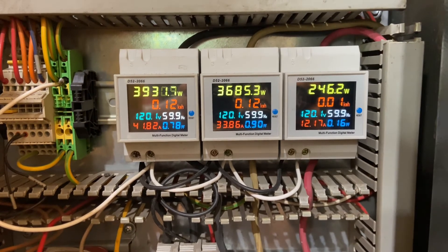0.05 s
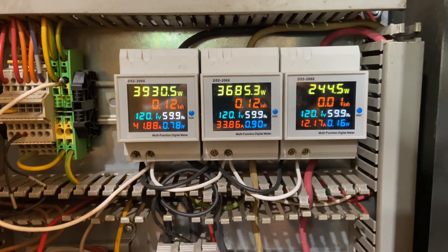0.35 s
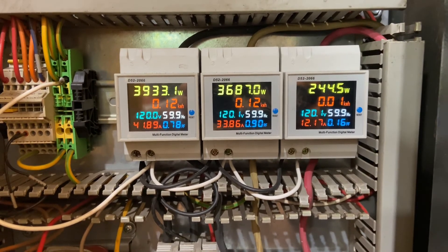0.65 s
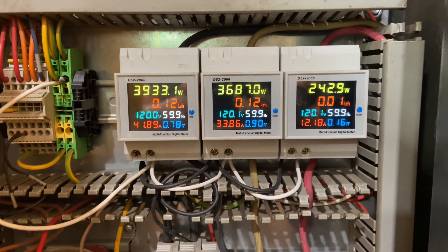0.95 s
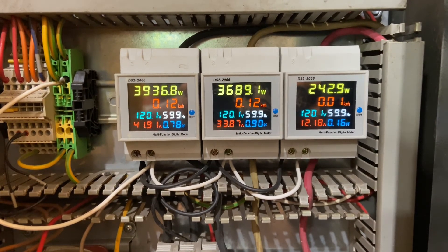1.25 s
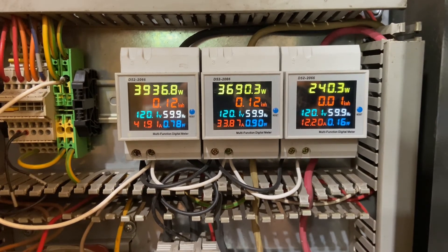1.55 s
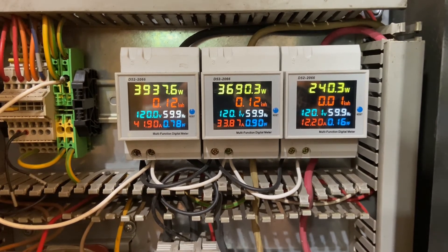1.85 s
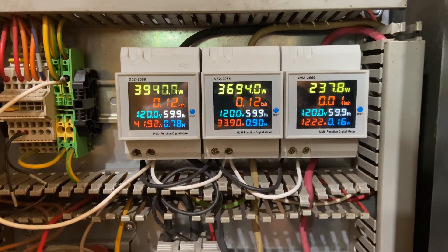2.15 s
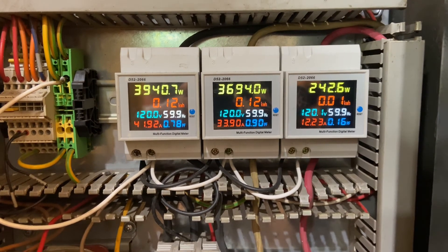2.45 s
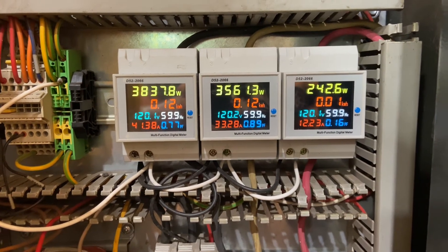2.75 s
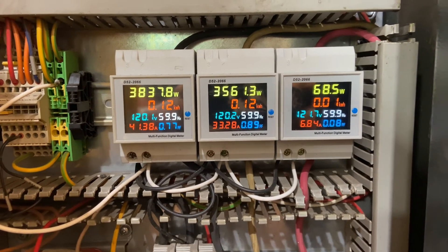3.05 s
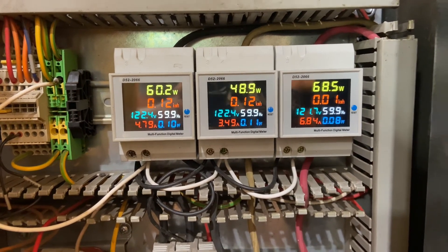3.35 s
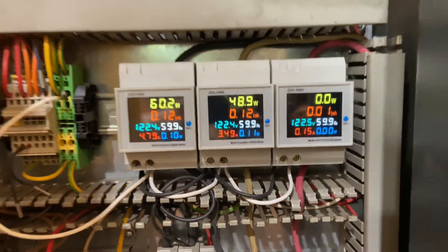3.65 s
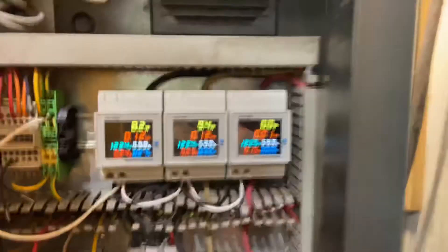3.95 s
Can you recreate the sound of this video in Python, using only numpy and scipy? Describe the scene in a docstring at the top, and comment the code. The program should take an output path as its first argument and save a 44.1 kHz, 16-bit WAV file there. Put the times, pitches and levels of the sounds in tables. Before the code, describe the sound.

An electric compressor runs with a loud steady hum, whine and rushing air. At about 2.3 seconds its power switch drops out with a sharp clunk, slightly left, and the hum stops. The whine falls and fades by about 3 seconds as the casing briefly shudders and rumbles. Ventilation and other machines' low hum carry on until 4 seconds, with a faint high whistle coming and going from 2.5 seconds.

```python
"""A compressor switches off

An electric compressor in a plant room, heard from its open switch cabinet, hums, whines and rushes
with air. Its contactor (the big power switch) drops out with a clunk and the hum stops. The shaft
runs down, and its falling overtones make the casing ring. Other machines' low hum and the
ventilation remain, with a faint whistle."""
import sys
import numpy as np
from scipy import signal
from scipy.fft import rfft, irfft
from scipy.io import wavfile

SR = 44100
rng = np.random.default_rng(int(sys.argv[2]) if len(sys.argv) > 2 else 0)


def inscribe(sig):
    """Save sig as 16-bit PCM at rate SR to the path in sys.argv[1].

    A 1-D sig is mono; a 2-D sig holds one channel per row.
    Samples are clipped to [-1, 1] before scaling.
    """
    pcm = np.round(np.clip(np.atleast_2d(sig).T, -1, 1) * 32767)
    wavfile.write(sys.argv[1], SR, pcm.astype(np.int16))


N = 176400
T = np.arange(N) / SR

OFF_S = 2.275  # the power is cut
COAST_S = 0.43  # run-down time: in each such span the shaft falls to 37% of its speed
SHAFT_HZ, MAINS_HZ = 59.078, 60.0
CLUNK_PAN_DB = 4  # the clunk and the casing are this much louder on the left

# How wide the compressor's noise sounds. Each row: pitch in Hz, stereo side minus middle in dB.
COMPRESSOR_WIDTH = [(60, -21), (83, -30), (110, -20), (160, -24), (220, -33), (300, -2), (420, -15.5),
                    (580, 1.5), (810, -3.5), (1120, -4.5), (1540, 10.5), (2140, -2.5), (2960, -3),
                    (4090, -2), (5660, -5), (7830, 1.5), (10800, -3.5), (15000, 3)]


def from_db(db):
    """Turn decibels into a gain."""
    return 10 ** (np.asarray(db) / 20)


def rms_one(x):
    """Scale a signal to an average power of 1."""
    return x / np.sqrt(np.mean(x ** 2) + 1e-20)


def in_time(rows):
    """Join (seconds, value) rows by straight lines."""
    return np.interp(T, *np.transpose(rows))


def at_hz(points, hz):
    """Read between (Hz, value) rows, with octaves evenly spaced."""
    freqs, values = np.transpose(points)
    return np.interp(np.log(np.maximum(hz, 1)), np.log(freqs), values)


def pan(db):
    """Left and right gains that put the left db above the right at the same total power."""
    return rms_one(from_db([[db / 2], [-db / 2]]))


def drift(rate):
    """A smooth random wander of typical size 1; a higher rate in Hz makes it quicker."""
    pole = np.exp(-200 * np.pi * rate / SR)
    steps = rng.standard_normal(N // 100 + 1002)  # one per 100 samples, plus a run-in
    slow = signal.lfilter([1], [1, -2 * pole, pole * pole], steps)[1000:]
    return np.interp(np.arange(N) / 100, np.arange(len(slow)), rms_one(slow))


def noise_bands(spectrum, width):
    """Stereo noise of a given spectrum and width, as half-octave bands: (centre in Hz, sound)."""
    f = np.arange(N // 2 + 1) * SR / N
    mid, side = rfft(rng.standard_normal((2, N)))
    side_gain = from_db(at_hz(width, f))
    stereo = mid + side_gain * side * [[1], [-1]]
    shaped = stereo * from_db(at_hz(spectrum, f)) * np.sqrt(SR / 2 / (1 + side_gain ** 2))
    place = np.clip(2 * np.log2(np.maximum(f, 1) / 62.5), 0, 16)  # half octaves above 62.5 Hz
    return [(62.5 * 2 ** (k / 2), irfft(shaped * np.maximum(0, 1 - abs(place - k)), N))
            for k in range(17)]


def noise(spectrum):
    """Steady stereo noise of a given spectrum, as wide as the compressor."""
    return sum(band for _, band in noise_bands(spectrum, COMPRESSOR_WIDTH))


def tone(hz, db, waver_db):
    """A pure tone whose level wavers around db."""
    turns = np.cumsum(hz * np.ones(N)) / SR + rng.random()
    return np.sqrt(2) * from_db(db + waver_db * drift(5.4)) * np.sin(2 * np.pi * turns)


def coloured(x, bumps):
    """Boost or cut a sound around each (Hz, width in Hz, dB) row."""
    f = np.arange(N + 1) * SR / (2 * N)
    gain = from_db(sum(db / (1 + (2 * (f - hz) / width) ** 4) for hz, width, db in bumps))
    return irfft(rfft(x, 2 * N) * gain)[:, :N]


def room_echo(x, fade_s=0.91):
    """Reflections blur into a tail, different on each side, that falls 60 dB in fade_s."""
    tail = rng.standard_normal((2, SR)) * from_db(-60 * T[:SR] / fade_s)
    return signal.fftconvolve(x, rms_one(tail) / np.sqrt(SR), axes=1)[:, :N]


def powered(release_s=0.011):
    """1 while current flows, then a quick fall to 0."""
    return np.exp(-np.maximum(T - OFF_S, 0) / release_s)


def mains_hum():
    """While powered, the motor's coils hum at twice the mains frequency, with weaker tones beside it."""
    # The main hum's loudness. Each row: time in seconds, level in dB.
    hum_levels = [(0, -16), (.9, -16), (1.3, -19), (1.55, -17), (2.25, -18)]
    # The weaker tones. Each row: pitch in Hz, level in dB, waver in dB.
    side_tones = [(60, -40, 1), (96, -40, 1), (168, -42, 2), (240, -38, 2), (300, -44, 1), (568, -49, 1),
                  (902, -45, 2), (1351, -50, 2), (1375, -46, 1), (1804, -47, 1)]
    hum = tone(2 * MAINS_HZ, in_time(hum_levels), waver_db=1)
    hum += sum(tone(*row) for row in side_tones)
    return hum * powered() * pan(1.5)


def shaft_whine(slowing, fade_db=26):
    """Overtones follow the shaft: nearly steady under power, then juddering, falling and fading."""
    # Strong overtones. Each row: multiple of the shaft's speed, level in dB, left minus right in dB,
    # how far the left wave leads in radians.
    overtones = [(8, -35, -1, 1.1), (11, -45, 1, .3), (13, -50, 1, -2.6), (15, -33, 4, -.8),
                 (16, -39, 0, -1.2), (17, -46, -1, .3), (19, -49, 8, .8), (24, -41, 0, -2.2),
                 (28, -40, -7, -2.3), (30, -48, -3, 0), (32, -45, 0, .4), (34, -49, 6, 2.6),
                 (39, -48, -1, 0), (40, -49.5, 2, .2), (41, -53, -8, 2.1), (45, -44, 1, -1),
                 (49, -52, 12, .7), (51, -53, 0, 0), (52, -45, 0, 2.2), (53, -45.5, 4, .3),
                 (54, -51, 12, 1), (55, -54, 0, 0), (58, -51, 12, -1.1), (62, -53, 3, 1), (63, -53, 6, 0),
                 (73, -56, 6, 0), (85, -57, -1, .5), (89, -58, 0, -.6), (93, -56, 2, 2.9),
                 (104, -52.5, 4, .3), (107, -59, 1, .8), (108, -60, 1, .2), (113, -55.5, 3, 0),
                 (126, -59, 1, 0)]
    # The weak overtones between them. Each row: pitch in Hz, level of an overtone there in dB.
    weak_levels = [(300, -50), (380, -60), (1000, -66), (2000, -55), (3100, -55.5), (4300, -61.5),
                   (5400, -72), (5900, -76), (6500, -78), (7400, -64), (8000, -67)]
    wobble = 0.00024 * drift(7.9)
    judder = 0.06 * (1 - powered()) * drift(70)
    speed_hz = SHAFT_HZ * np.exp(-slowing) * (1 + wobble + judder)
    angle = 2 * np.pi * np.cumsum(speed_hz) / SR
    strong = {round(row[0]): row[1:] for row in overtones}
    wavers = [from_db(1.3 * drift(4)) for _ in range(11)]
    whine = np.zeros((2, N))
    for k in range(5, 134):
        size, side, lead, start = rng.standard_normal(4)
        weak_db = at_hz(weak_levels, k * SHAFT_HZ) + 1.5 * np.tanh(size)
        db, pan_db, lead = strong.get(k, (weak_db, 4 * side, lead))
        phase = (k * angle + 2 * np.pi * start + np.array([[lead], [0]])).astype(np.float32)
        whine += np.sqrt(2) * from_db(db) * pan(pan_db) * wavers[k % len(wavers)] * np.sin(phase)
    whine *= from_db(-fade_db * slowing)
    return whine + from_db(-7.5) * room_echo(whine * (1 - powered()))


def rushing_air(slowing, flicker_db=1.74, power_off_db=-1.5):
    """Air and bearing noise dies away as the shaft slows, fastest around 4000 Hz."""
    # The noise at full speed. Each row: pitch in Hz, level in dB per Hz.
    spectrum = [(30, -76), (70, -54), (110, -49), (170, -51.5), (260, -60), (330, -60), (500, -63.5),
                (700, -59), (860, -62), (1200, -62), (1500, -58.5), (1850, -62.5), (2450, -68.5),
                (3100, -65), (4200, -72), (5200, -74.5), (5800, -80.5), (6500, -73), (7600, -78.5),
                (10500, -85), (16000, -88)]
    # How fast it fades. Each row: pitch in Hz, dB lost per run-down time.
    fades = [(150, 3.4), (700, 10.4), (2000, 12.7), (4000, 28), (7000, 18), (12000, 8.9)]
    # Which way it leans. Each row: pitch in Hz, left minus right in dB.
    balance = [(100, 4.5), (500, -0.5), (850, 6.5), (1300, -2.5), (1700, -5.5), (3000, 3), (4700, 3),
               (7000, 0.5), (14000, -0.5)]
    # Peaks and hollows that the casing adds. Each row: pitch in Hz, width in Hz, gain in dB.
    casing_bumps = [(390, 50, 3), (730, 50, -2.5), (880, 60, 4), (1020, 60, -2), (1275, 110, -5),
                    (1432, 28, 6), (1480, 40, -4), (1535, 40, 3), (1690, 70, -4.5), (1765, 70, 4.5),
                    (1865, 35, -4.5), (2260, 35, -4), (2310, 50, 2.5), (2500, 45, -3.5), (2570, 70, 3.5),
                    (2775, 60, -4.5), (2895, 50, 3), (2955, 45, -3), (4050, 70, -3), (6200, 200, 2),
                    (7000, 350, -3.5)]
    air = np.zeros((2, N))
    for hz, band in noise_bands(spectrum, COMPRESSOR_WIDTH):
        db = flicker_db * drift(20.6) - at_hz(fades, hz) * slowing
        air += band * pan(at_hz(balance, hz)) * from_db(db)
    return coloured(air, casing_bumps) * from_db(power_off_db * (1 - powered()))


def ventilation(flicker_db=1.5):
    """The room's ventilation blows throughout, flickering slightly."""
    # The moving air. Each row: pitch in Hz, level in dB per Hz.
    spectrum = [(20, -85), (38, -59), (65, -51), (85, -58), (110, -55), (145, -58), (175, -55),
                (280, -57.5), (340, -67), (500, -64.5), (650, -70.5), (1350, -73), (2300, -76.5),
                (3300, -82.5), (3700, -80), (5000, -88.5), (7500, -90.5), (11000, -91.5), (16000, -93)]
    # How wide it sounds. Each row: pitch in Hz, stereo side minus middle in dB.
    width = [(60, -11), (99, -25), (160, -22), (270, -6.5), (450, -1.5), (740, -1.5), (1220, -1),
             (2010, 0.5), (3330, -1.5), (5500, -3), (9080, 4), (15000, -3)]
    return sum(band * from_db(flicker_db * drift(8.3)) for _, band in noise_bands(spectrum, width))


def other_machines(hum_hz=51.8):
    """Other machines keep up a low hum with fainter tones above it."""
    # The low hum's loudness. Each row: time in seconds, level in dB.
    hum_levels = [(0, -29), (1.0, -27), (1.5, -27.5), (2.25, -27), (2.6, -23.5), (3.2, -23), (4, -23.5)]
    # The fainter tones. Each row: pitch in Hz, level in dB, waver in dB.
    upper_tones = [(119.5, -38, -1), (172, -40, 0), (216, -42, 2), (283.2, -48, 2), (301, -44.5, 2),
                   (361, -53, 2), (1328, -57.5, 1.5), (1437, -61, 1.5)]
    return tone(hum_hz, in_time(hum_levels), waver_db=0.8) + sum(tone(*row) for row in upper_tones)


def contactor(unstick_s=2.2615, tick_decay_s=0.005, crack_decay_s=0.003):
    """The switch's moving iron comes unstuck with a tick, then bounces on its stop, ringing the housing."""
    # The hit and its bounces. Each row: start in seconds, level in dB.
    knocks = [(2.2677, 2.5), (2.2712, -1), (2.2748, -6), (2.2782, -15), (2.2945, -21)]
    # The housing's ringing notes. Each row: pitch in Hz, level in dB, seconds to fall 60 dB.
    housing_notes = [(156, -17, 0.06), (770, -16.5, 0.065), (880, -29, 0.045), (1170, -28, .04),
                     (1690, -23, 0.055), (2330, -28, .03), (2920, -27, .035), (3200, -16.5, .038),
                     (3760, -25.5, 0.03), (5020, -20, 0.032), (6850, -26, 0.033), (11500, -34, 0.033),
                     (11800, -39, 0.04), (12500, -29, 0.04)]
    # The bright tick. Each row: pitch in Hz, level in dB per Hz.
    tick_spectrum = [(1000, -75), (3000, -72), (5200, -56), (8000, -71), (11500, -62), (15000, -59),
                     (16000, -62)]
    # The crack of a knock. Each row: pitch in Hz, level in dB per Hz.
    crack_spectrum = [(200, -61), (550, -66), (900, -59), (2000, -53), (4500, -56.5), (6000, -69),
                      (7500, -57.5), (11500, -63.5), (14000, -62), (16000, -65)]
    ring, bursts = np.zeros((2, N)), np.zeros(N)
    t = T[:SR // 2]
    for start_s, db in knocks:
        age = np.maximum(T - start_s, 0)
        bursts += from_db(db) * (age > 0) * np.exp(-age / crack_decay_s)
        start = int(start_s * SR)
        for hz, note_db, fade_s in housing_notes:
            phase = rng.uniform(0, 2 * np.pi) + rng.normal(0, 0.39, (2, 1))
            level = from_db(db + note_db - 60 * t / fade_s)
            ring[:, start:start + len(t)] += level * np.sin(2 * np.pi * hz * t + phase)
    tick = noise(tick_spectrum) * (T > unstick_s) * np.exp(-abs(T - unstick_s) / tick_decay_s)
    clunk = (tick + ring + bursts * noise(crack_spectrum)) * pan(CLUNK_PAN_DB)
    return clunk + from_db(-18) * room_echo(clunk)


def frame_rumble(rise_s=0.083):
    """The jolt of switching off leaves the frame rumbling."""
    # The frame's low notes. Each row: pitch in Hz, level in dB, seconds to fall 60 dB.
    frame_notes = [(98, -30, 3.2), (127.4, -25, 3.3), (172.5, -44, 1.6)]
    age = np.maximum(T - OFF_S, 0)
    rumble = sum(tone(hz, db - 60 * age / fade_s, waver_db=2) for hz, db, fade_s in frame_notes)
    return rumble * (1 - np.exp(-age / rise_s))


def casing_shudder(rattle_hz=110, rattle_db=3.5):
    """The casing rings in short, rough swells, as when falling overtones pass through its own notes."""
    # The swells. Each row: middle in seconds, pitch in Hz, level in dB, half length in seconds.
    swells = [(2.341, 1200, -41, 0.012), (2.357, 720, -38, .012), (2.43, 1460, -38.5, 0.013),
              (2.428, 500, -37, .01), (2.447, 575, -30, 0.0092), (2.51, 520, -38.5, .014),
              (2.545, 1440, -43, 0.014), (2.57, 900, -44, .025), (2.605, 719, -42, .022),
              (2.64, 1246, -42.5, 0.016), (2.837, 345, -40, 0.018)]
    casing = np.zeros(N)
    for middle_s, hz, db, half_s in swells:
        sink = np.exp(-np.clip(T - middle_s, -2 * half_s, 2 * half_s) / COAST_S)  # with the shaft
        pitch = hz * sink * (1 + 0.06 * drift(rattle_hz))
        rough = tone(pitch, db + rattle_db * drift(rattle_hz), waver_db=0)
        casing += rough * np.exp(-0.5 * ((T - middle_s) / half_s) ** 2)
    casing = casing * pan(CLUNK_PAN_DB)
    return casing + from_db(-11) * room_echo(casing)


def thin_hiss(middle_s=2.352, half_s=0.038):
    """A short, very high hiss as the machine unloads."""
    # The hiss. Each row: pitch in Hz, level in dB per Hz.
    spectrum = [(5000, -90), (7000, -83), (11000, -80), (14000, -88), (15000, -69), (16000, -83)]
    return noise(spectrum) * np.exp(-0.5 * ((T - middle_s) / half_s) ** 2)


def whistle(wander_hz=4):
    """A thin whistle of nearly steady pitch, with two weaker side tones, comes and goes."""
    # Its three tones. Each row: pitch in Hz, relative level in dB.
    tones = [(3463, -10), (3627, 1), (3885, -9)]
    # Its swells. Each row: time in seconds, level in dB.
    levels = [(2.45, -72), (2.55, -56), (2.66, -55), (2.71, -72), (2.79, -54), (2.85, -55), (2.9, -61),
              (2.97, -58), (3.02, -64), (3.13, -62), (3.19, -53), (3.27, -59), (3.35, -51), (3.43, -52),
              (3.48, -61), (3.55, -65), (3.61, -50), (3.67, -58), (3.72, -72), (4, -62)]
    return sum(tone(hz + wander_hz * drift(31), in_time(levels) + db, waver_db=1) for hz, db in tones)


def scene():
    """The compressor runs, is switched off and winds down while the room carries on."""
    slowing = np.maximum(T - OFF_S, 0) / COAST_S  # run-down times since the cut
    compressor = mains_hum() + shaft_whine(slowing) + rushing_air(slowing)
    background = ventilation() + other_machines()
    switch_off = contactor() + frame_rumble() + casing_shudder() + thin_hiss()
    return compressor + background + switch_off + whistle()


def record(dry, cutoff_hz=15900):
    """The microphone has two dips in the treble, and the very top is cut off."""
    # The dips. Each row: pitch in Hz, width in Hz, gain in dB.
    mic_dips = [(9000, 1000, -24), (13150, 1000, -22)]
    low_pass = signal.ellip(12, 0.2, 80, cutoff_hz, fs=SR, output="sos")
    return signal.sosfilt(low_pass, coloured(dry, mic_dips))


dry = scene()
out = record(dry)
inscribe(out)
```